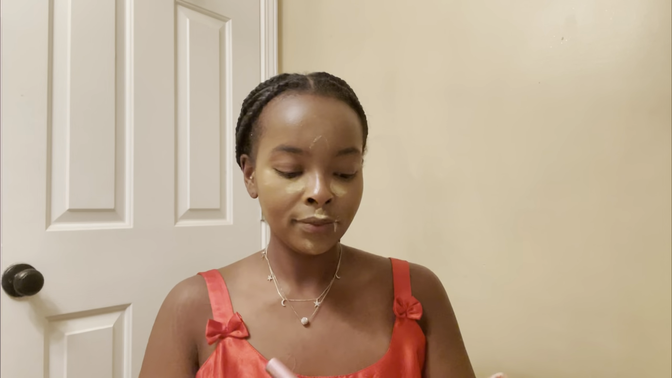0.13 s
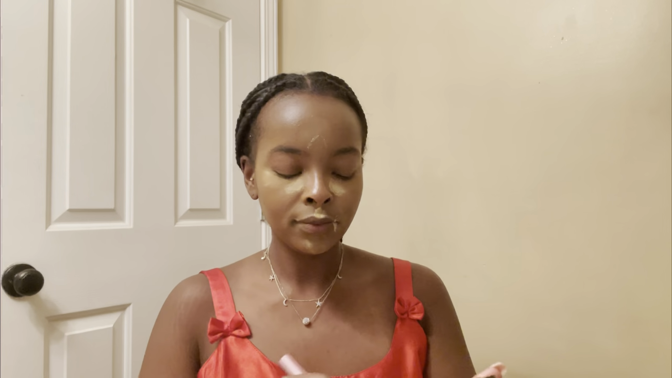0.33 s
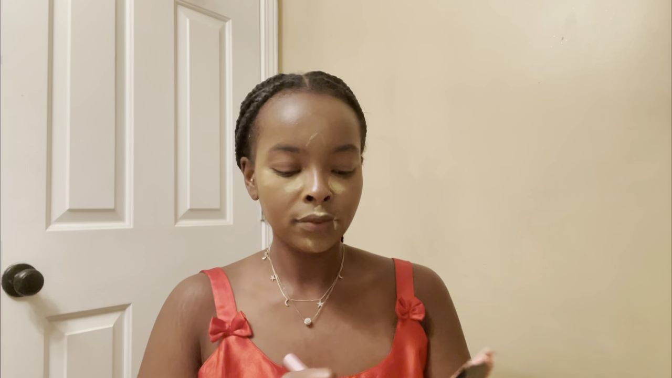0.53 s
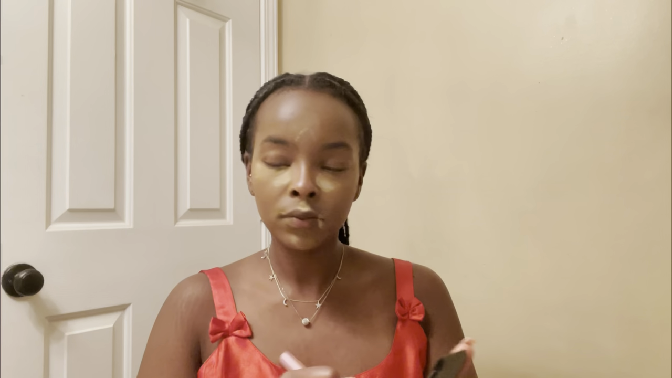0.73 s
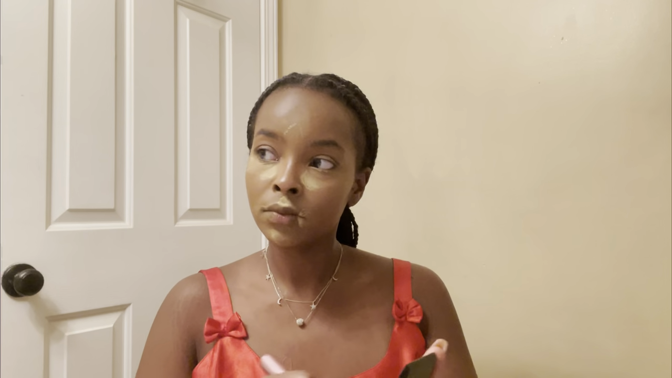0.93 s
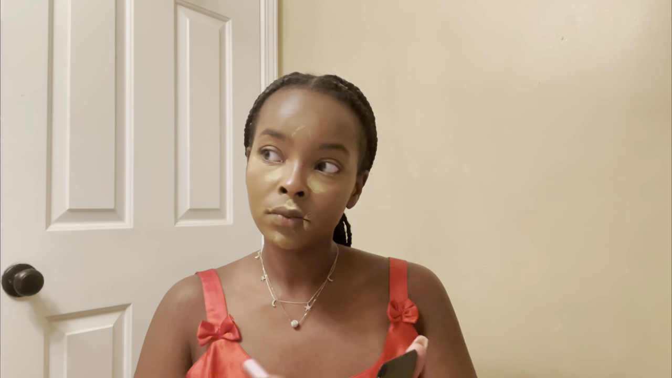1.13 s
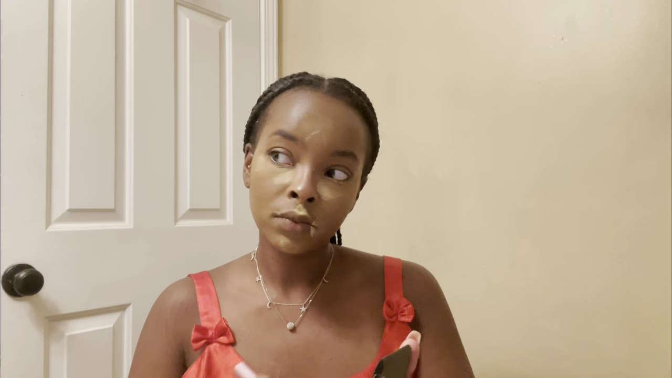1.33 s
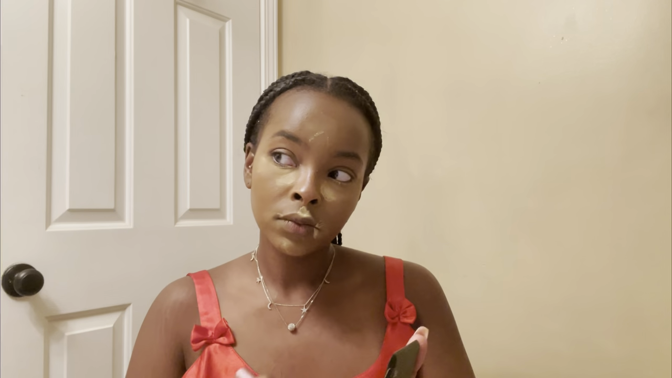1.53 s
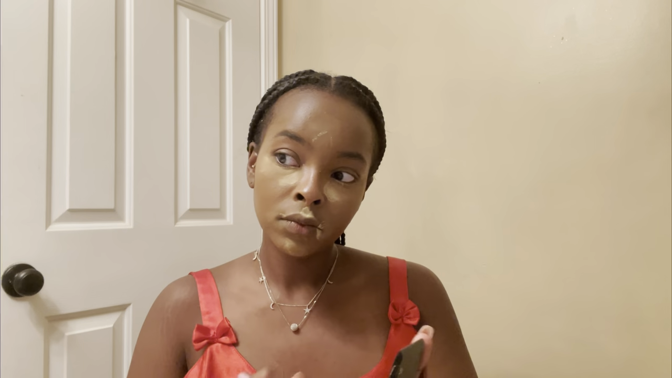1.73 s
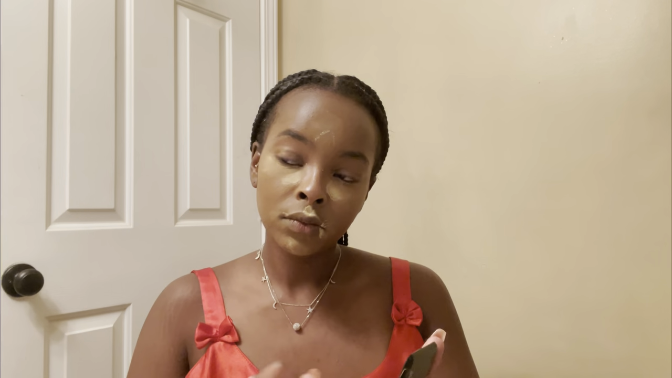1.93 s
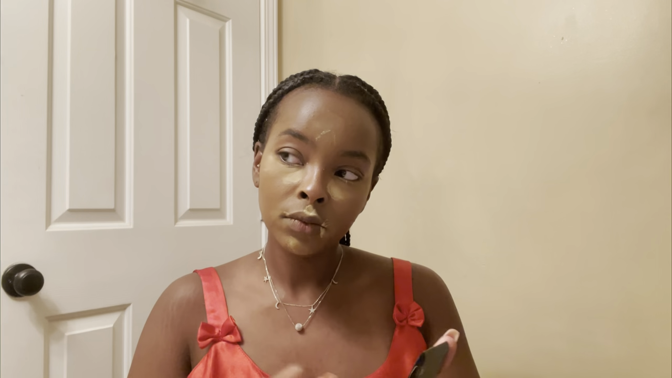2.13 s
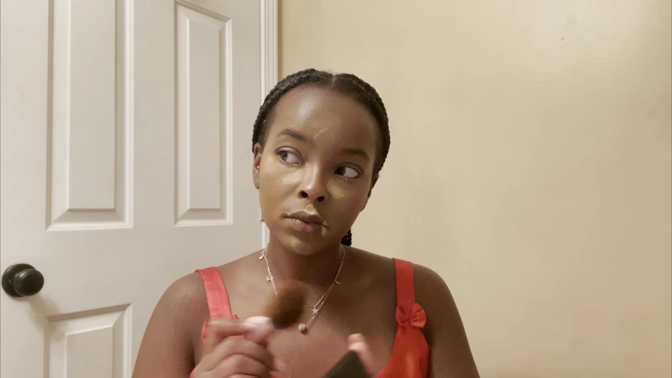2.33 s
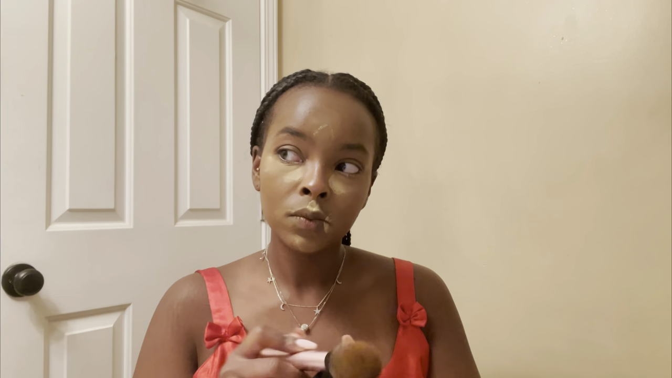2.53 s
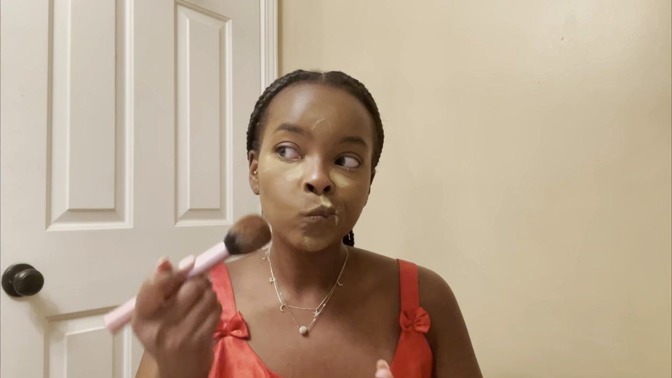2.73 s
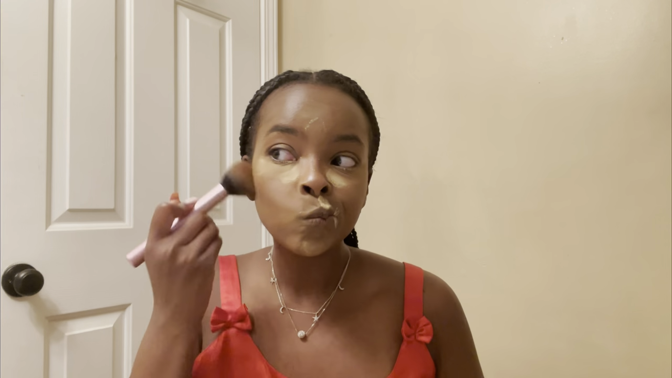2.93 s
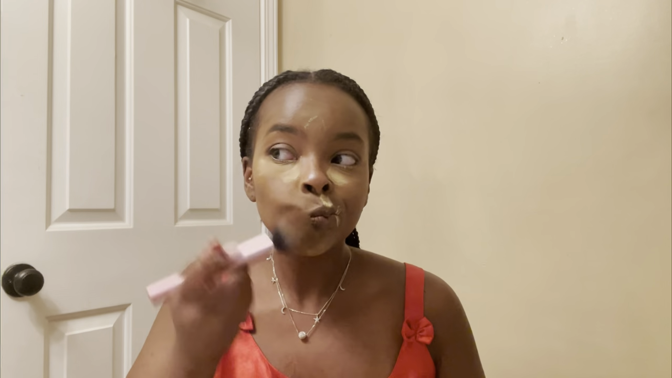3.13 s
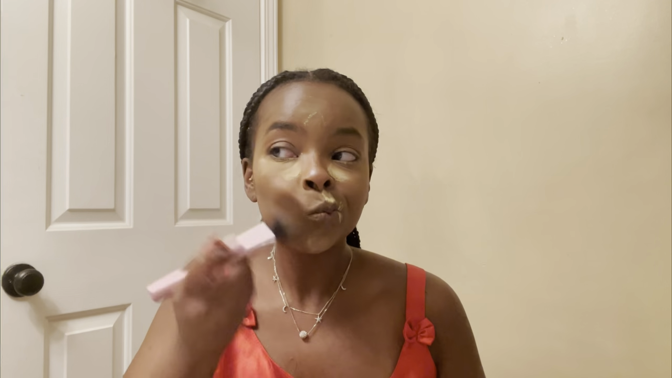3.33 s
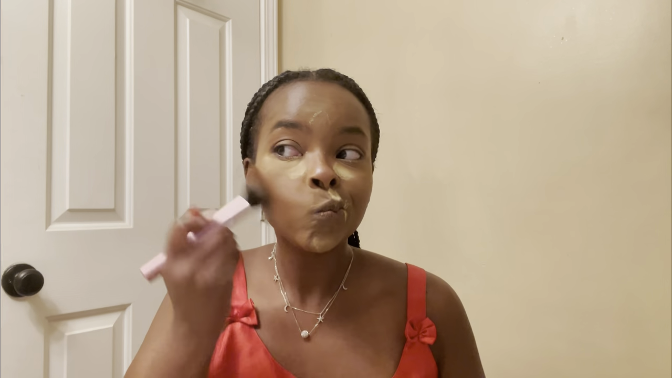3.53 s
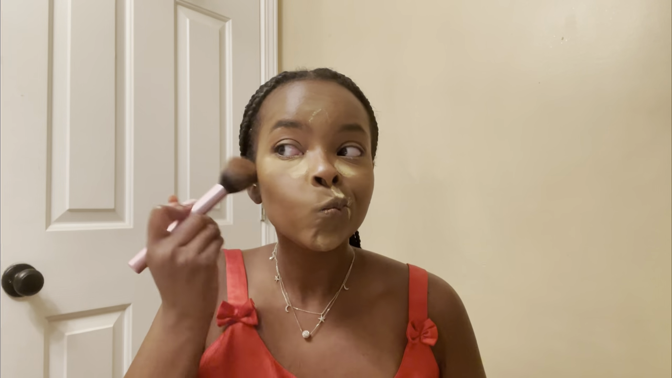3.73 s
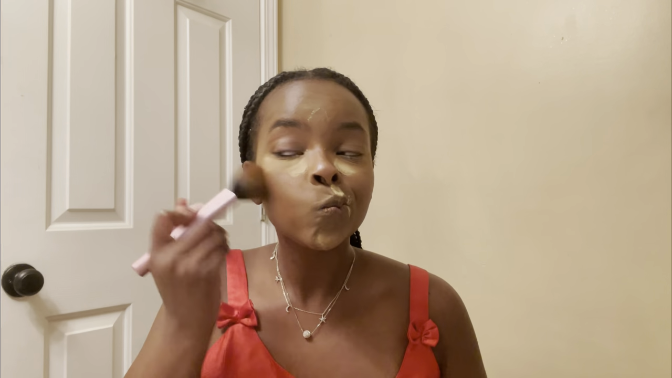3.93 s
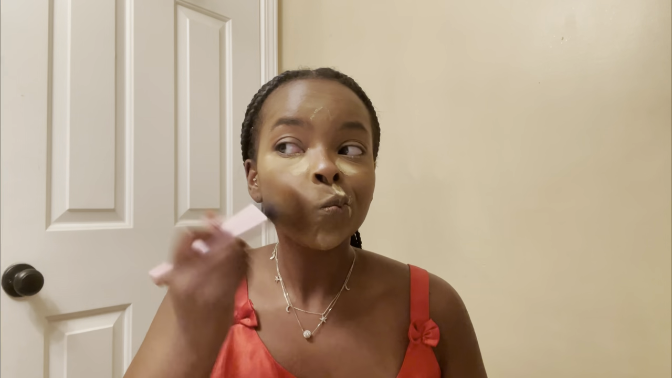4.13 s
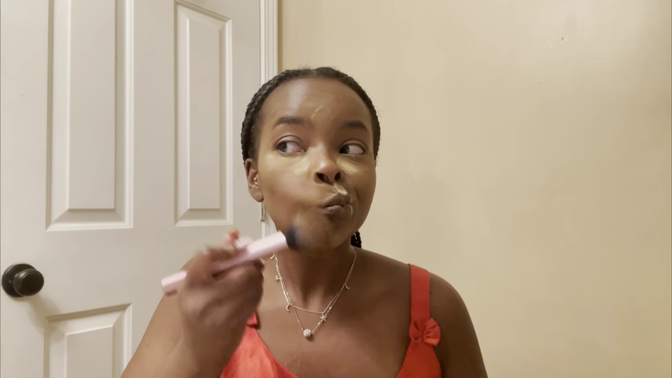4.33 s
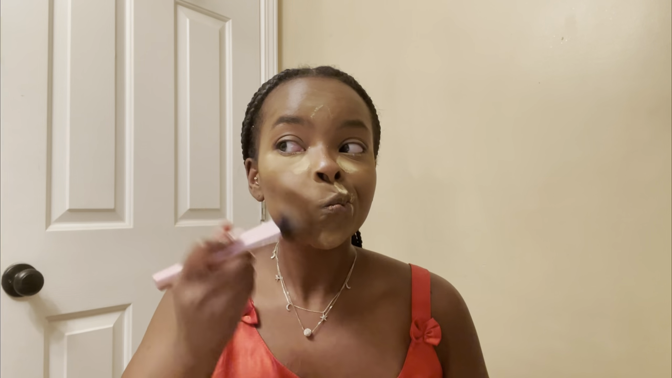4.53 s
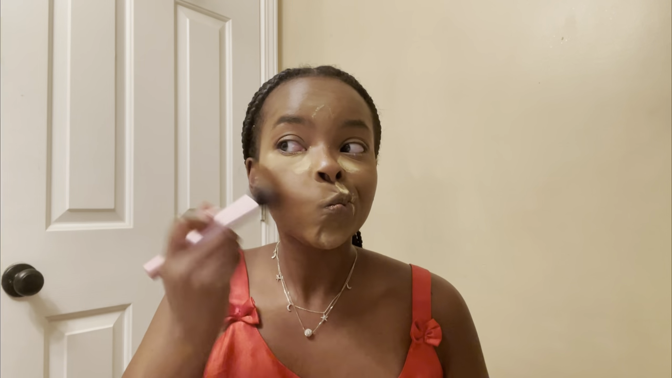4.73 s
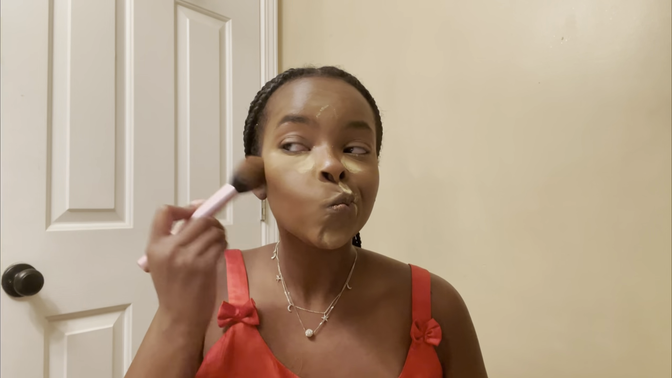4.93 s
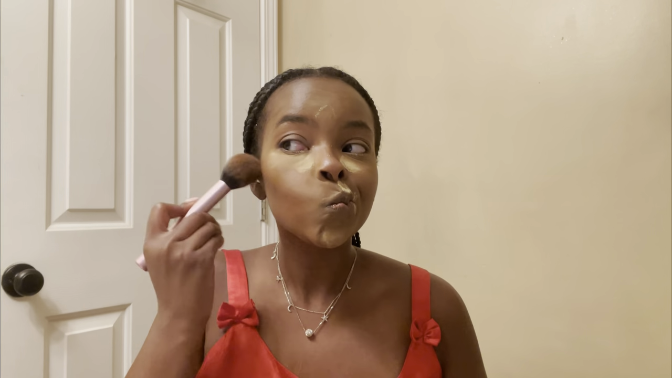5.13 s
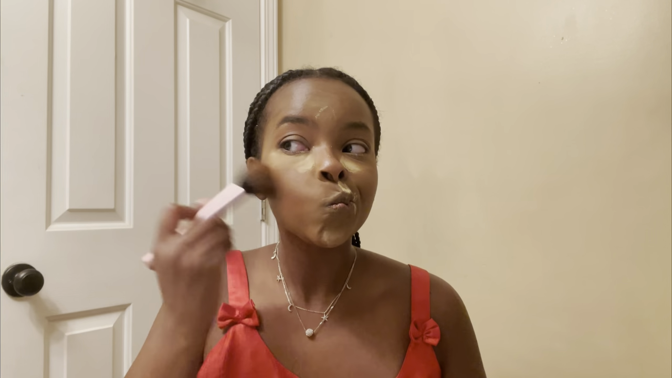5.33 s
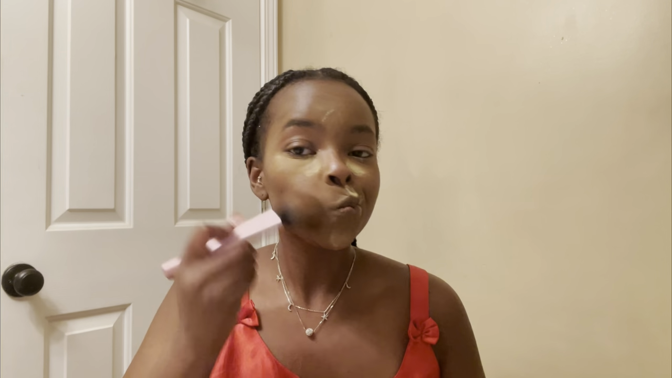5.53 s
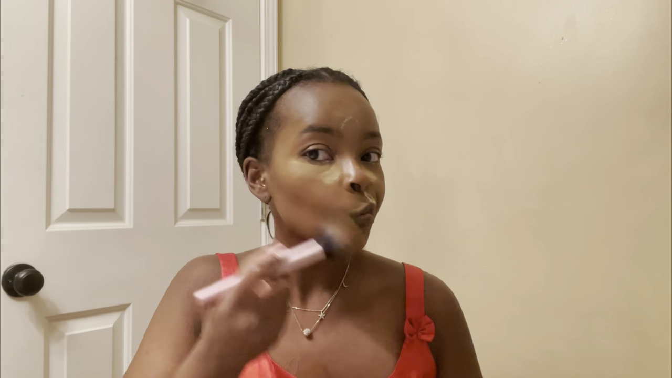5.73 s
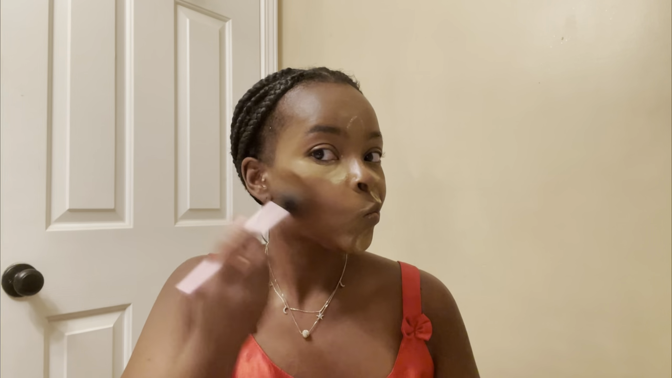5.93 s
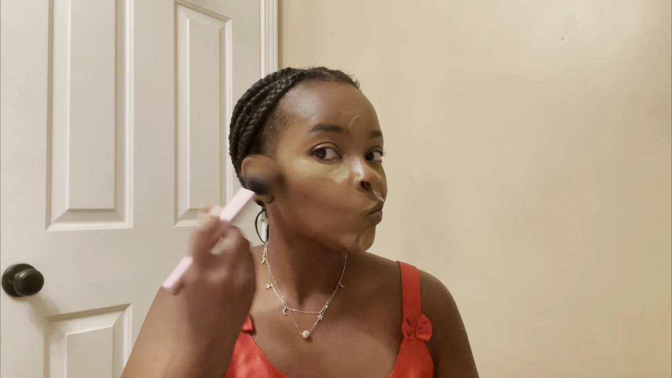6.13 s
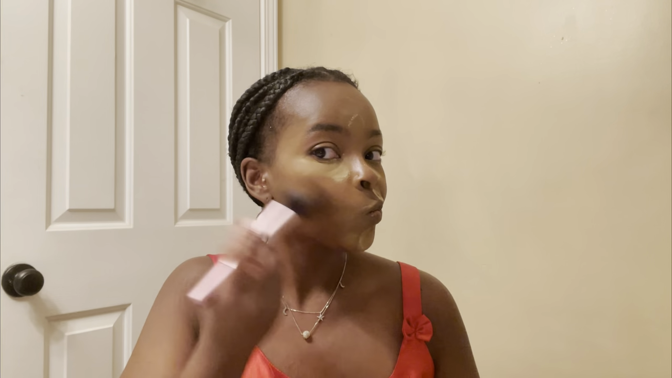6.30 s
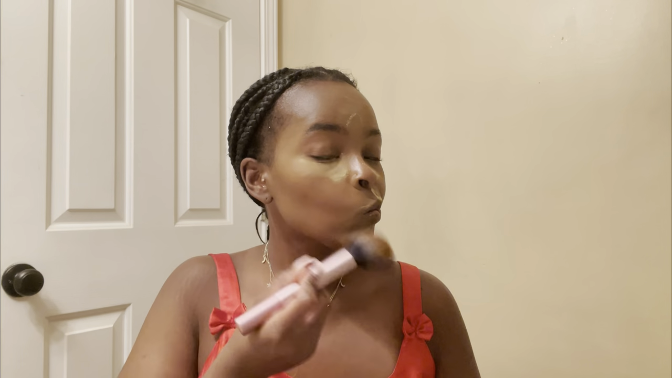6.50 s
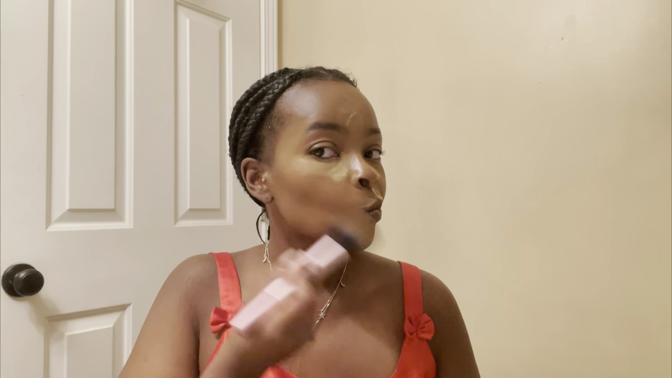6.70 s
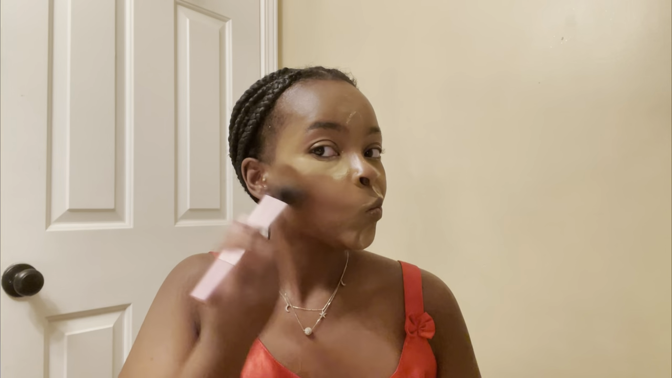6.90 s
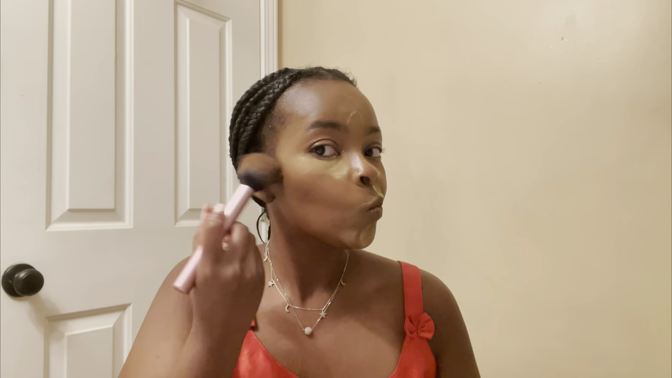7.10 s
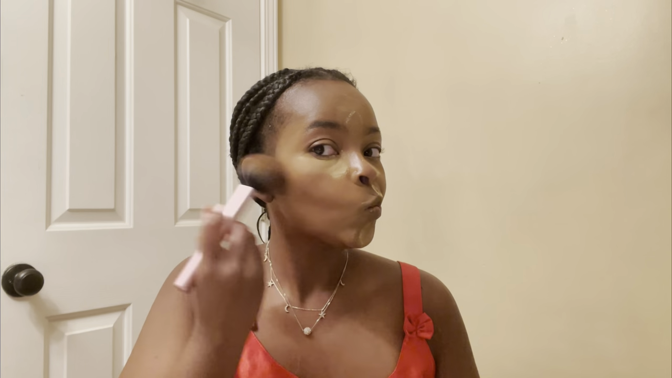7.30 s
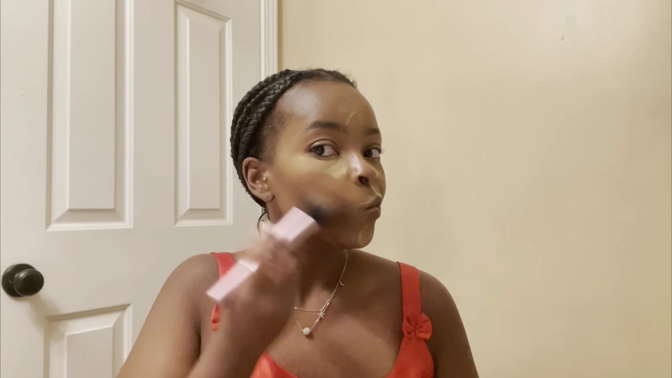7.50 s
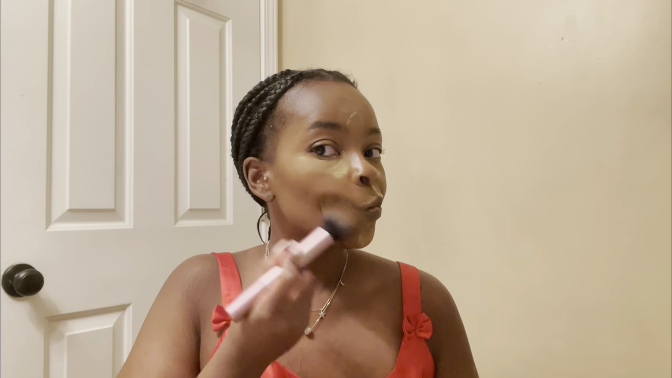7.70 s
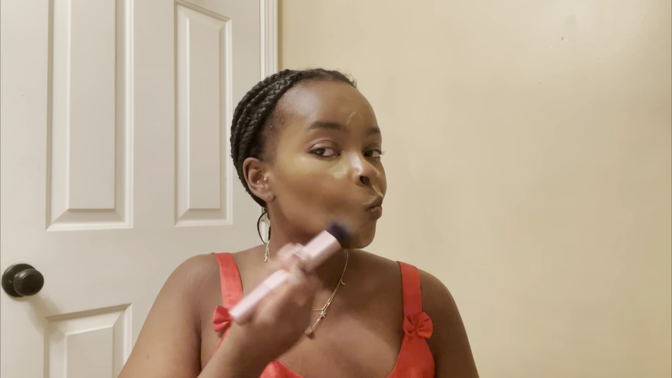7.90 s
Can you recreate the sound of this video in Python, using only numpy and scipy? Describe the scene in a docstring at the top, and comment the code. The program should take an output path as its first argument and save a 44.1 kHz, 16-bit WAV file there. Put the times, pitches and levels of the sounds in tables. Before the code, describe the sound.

In a small, hard-walled room with low ventilation rumble and hum, a soft brush swirls in powder with faint, irregular hissy dabs while a palm slides on the case. Two quick plastic knocks and a tiny tick follow. After a short pause, bristles sweep a cheek in fast, rhythmic out-and-back swishes, with brief breaks. A phone records it in stereo from nearby.

```python
"""Powder brush in a small room

A soft brush is swirled in a powder compact, knocked against it to shed the excess, then swept over a cheek.
Brush and palm are noise shaped stroke by stroke; the knocks set damped modes ringing.
The small, hard-walled room answers the knocks with dense reflections; ventilation rumbles and hums behind.
A phone picks it all up in stereo through two spaced ports."""
import sys
import numpy as np
from scipy import signal
from scipy.fft import rfft, irfft
from scipy.io import wavfile

SR = 44100
rng = np.random.default_rng(int(sys.argv[2]) if len(sys.argv) > 2 else 0)


def put_to_file(sound):
    """Save the sound as 16-bit audio at rate SR, in the file named by the first command-line argument."""
    columns = np.atleast_2d(sound).T  # one column per channel
    safe = np.clip(columns, -1, 1)
    whole_steps = np.round(safe * 32767)
    wavfile.write(sys.argv[1], SR, whole_steps.astype(np.int16))


N = 351010
T = np.arange(N) / SR  # s
HZ = np.maximum(np.fft.rfftfreq(N, 1 / SR), 1)

# All levels are relative: source and mix gains are applied later.
# Dips of the brush into the powder: [centre t/s, half-power length/s, pressure as hiss level/dB]
POWDER_DIPS = [(0.105, 0.055, -78), (0.169, 0.044, -62), (0.365, 0.051, -65.5), (0.586, 0.069, -73),
               (0.723, 0.071, -73.5), (0.879, 0.15, -76.5), (1.086, 0.062, -70.5), (1.272, 0.049, -71),
               (1.46, 0.061, -77.5), (1.657, 0.063, -74), (1.826, 0.077, -75.5), (1.996, 0.049, -68),
               (2.167, 0.043, -70.5)]
# Bouts of sweeping from cheekbone to jaw:
# [start t/s, end t/s, period/s, return stroke after/s, return hiss level/dB, return rub level/dB]
CHEEK_SWEEPS = [(3.094, 3.7, 0.24, 0.11, 0, -3), (3.838, 5.37, 0.23, 0.1, -1.7, -4.5),
                (5.485, 6.35, 0.2434, 0.12, 0.5, 1.5), (6.475, 7.95, 0.24, 0.11, 1.5, 1.6)]
# How hard the brush bears on the cheek: [t/s, hiss level/dB]
CHEEK_PRESSURE = [(3.09, -81.5), (3.6, -78.8), (4.35, -78), (5.05, -81), (5.55, -84), (6.2, -81),
                  (6.9, -77.5), (7.45, -81.5), (7.9, -79)]
# Strokes that land harder: [t/s, extra hiss level/dB, extra rub level/dB]
HARD_STROKES = [(3.2, 2.5, 2), (3.59, 1.5, 5.5), (3.84, 2.5, 4), (4.41, .5, 4), (4.54, .5, 2.5),
                (5.35, 5, 1), (5.84, 3, 4), (6.22, 2.5, 1.5)]
# Spectrum of the hair tips on powder: [f/Hz, level/dB per Hz]
POWDER_HISS = [(3000, -31.5), (5000, -21), (6200, -8), (9000, -2.5), (13500, -0.5), (16000, -6.5)]
# Spectrum of the hair tips on skin: [f/Hz, level/dB per Hz]
CHEEK_HISS = [(3000, -27), (5000, -14.5), (6200, -3), (8000, -4.5), (10000, 1.5), (13500, -2),
              (16000, -4.5)]
# Extra brightness of hairs pressed hard: [f/Hz, level/dB per Hz]
SIZZLE = [(6000, -26), (9000, -9), (12000, -2.5), (14500, 1), (16000, -0.5)]
# Duller rub of the powder pan: [f/Hz, level/dB per Hz]
POWDER_RUB = [(300, -6), (800, -2.5), (1500, 1), (2000, 4.5), (2280, 10.5), (2450, -4.5), (3000, 4.5),
              (4300, -2), (5000, -21.5), (8000, -36)]
# Duller rub of the skin: [f/Hz, level/dB per Hz]
CHEEK_RUB = [(300, -10), (1000, 4), (2200, -2.5), (2600, -4), (3600, 5), (4400, -3.5), (5000, -35),
             (8000, -29)]
# Handle against compact: [t/s, tick level/dB, case level/dB, hollow level/dB, share sent to room/dB]
KNOCKS = [(2.4043, 2.5, 6, 5, -1.5), (2.405, -4.5, -13, -14, -8), (2.4866, -6, 1, 2.5, -7.5),
          (2.4880, -18, -11, -9.5, -11.5), (2.6420, -6.5, -31, -43, -6.5)]
# Bright, quickly damped ring of the hard contact: [f/Hz, level/dB, t60/s]
TICK_MODES = [(3600, -30.5, .002), (6680, -24, 0.0019), (8225, -21, 0.0011), (10370, -18, 0.0016),
              (12460, -18.5, 0.0011), (14700, -23, 0.0012)]
# Ring of handle and case: [f/Hz, level/dB, t60/s]
CASE_MODES = [(1326, -32.5, .014), (1587, -27.5, 0.02), (1956, -24.5, 0.017), (2200, -26.5, 0.012),
              (2900, -27.5, 0.0047), (3480, -31.5, 0.009), (3970, -29.5, 0.0076), (4590, -37.5, 0.015)]
# Hollow of the compact in the hand: [f/Hz, level/dB, t60/s]
HOLLOW_MODES = [(331.4, -43.5, 0.092), (451, -37, 0.041), (660, -33, .022), (855, -30.5, .022),
                (1067, -38, 0.027)]
# Hand shifting round the compact: [centre t/s, half-power length/s, level/dB]
HAND_SHIFTS = [(.02, .1, -68), (.2, 0.23, -77), (.42, 0.25, -78.5), (.78, 0.043, -67), (1.0, 0.22, -81.5)]
# Spectrum of the palm sliding on the case: [f/Hz, level/dB per Hz]
PALM = [(300, -4), (800, 6.5), (1500, 2), (2280, 3), (2500, -10), (3500, -9), (4500, -17), (5500, -26.5)]
# Spectrum of the ventilation air: [f/Hz, level/dB per Hz]
AIR = [(20, -28), (40, -9.5), (64, -1), (90, -3.5), (135, 2), (190, -8.5), (285, -15.5), (380, -19),
       (600, -22.5), (1000, -34), (1500, -39), (2250, -41.5), (2500, -44.5), (4200, -46.5), (5000, -59),
       (6300, -53.5), (11000, -52), (14200, -53.5), (16000, -62)]
# Resonances in the ventilation noise: [f/Hz, width/Hz, peak level/dB]
DUCT_RESONANCES = [(168, 12, 0.5), (220, 20, 6), (318, 5.3, 5.5), (379.6, 20, 9), (473.4, 25, 7.5),
                   (883, 71, 9)]
# Room decay: [f/Hz, t60/s]
ROOM_T60 = [(300, 0.3), (700, 0.32), (1900, 0.32), (4000, 0.33), (8000, 0.26), (15000, 0.14)]
# Side against mid from the spacing of the two ports: [f/Hz, level/dB]
PORT_SPREAD = [(60, -29.5), (150, -27), (400, -13.5), (900, -6.5), (2000, -14), (3900, -9), (5100, 8),
               (7000, 5.5), (10000, -4.5), (13000, -30.5)]
# Left minus right: [f/Hz, level/dB]
LEFT_TILT = [(60, -.3), (180, -1.3), (350, -2.5), (750, -4.5), (1400, 0), (3000, 0), (12000, .4)]
# Likeness of diffuse sound at the two ports: [f/Hz, correlation 0-1]
PORT_LIKENESS = [(100, .996), (350, .92), (800, .6), (2000, .5), (3000, .2), (4200, .45), (6000, .75),
                 (10000, .8), (12500, .99)]

# Pan rub at mean pressure, in dB, and its growth in dB per dB of pressure
PAN_RUB_DB, PAN_RUB_FOLLOWS = -77.5, 0.8
# Stroke on skin: half-power length, rub against hiss, chance spread of its strength
SWEEP_S, SKIN_RUB_DB, SWEEP_SPREAD_DB = 0.053, -4.5, 0.53
HARD_REACH_S = 0.045  # a hard landing lifts strokes within this time of it
HUM_HZ, HUM_DB, AIR_DB = 119.95, -60.5, -56
CUTOFF_HZ = 15800


def powder_strokes():
    """Each dip rubs the pan in step with its pressure; rows of t/s, length/s, hiss/dB, rub/dB."""
    t, length, hiss_db = np.transpose(POWDER_DIPS)
    rub_db = PAN_RUB_DB + PAN_RUB_FOLLOWS * (hiss_db - hiss_db.mean())
    return np.column_stack([t, length, hiss_db, rub_db])


def cheek_strokes():
    """The wrist swings out and back about four times a second; rows of t/s, length/s, hiss/dB, rub/dB."""
    strokes = []
    for start, end, period, back_s, back_hiss_db, back_rub_db in CHEEK_SWEEPS:
        for t in np.arange(start, end, period):
            strokes.append((t, 0, 0))
            strokes.append((t + back_s, back_hiss_db, back_rub_db))
    t, hiss_db, rub_db = np.transpose(strokes)
    for when, more_hiss_db, more_rub_db in HARD_STROKES:
        hard = np.abs(t - when) < HARD_REACH_S
        hiss_db = hiss_db + hard * more_hiss_db
        rub_db = rub_db + hard * more_rub_db
    pressure_db = np.interp(t, *np.transpose(CHEEK_PRESSURE))
    pressure_db = pressure_db + SWEEP_SPREAD_DB * rng.standard_normal(len(t))
    length = np.full(len(t), SWEEP_S)
    return np.column_stack([t, length, pressure_db + hiss_db, pressure_db + SKIN_RUB_DB + rub_db])


def brush(strokes, hiss, rub, hiss_db, rub_db, sizzle_db, grain_db, linger_db, edge, lean):
    """Thousands of hair tips slip and hiss, catching in tufts; the surface under them gives a duller rub."""
    tufts = rms_one(from_db(grain_db * flutter(per_s=270)))
    pressure = swell(strokes[:, [0, 1, 2]], linger_db, linger_s=0.045, edge=edge, lean=lean)
    tips = from_db(hiss_db) * pressure * diffuse(at_hz(hiss) + ripple(depth_db=2.1))
    # the top octave grows faster than the rest as the brush bears down
    bearing_down = pressure * np.sqrt(pressure / pressure.max())
    sizzle = from_db(sizzle_db) * bearing_down * diffuse(at_hz(SIZZLE) + ripple(depth_db=1.5))
    rubbing = swell(strokes[:, [0, 1, 3]], linger_db, linger_s=0.056, edge=edge, lean=lean)
    surface = from_db(rub_db) * rubbing * diffuse(at_hz(rub) + ripple(depth_db=3.0))
    return tufts * (tips + sizzle + surface)


def swell(strokes, linger_db, linger_s, edge=2.0, lean=0.0):
    """Amplitude of strokes: lean makes hairs land faster than they lift, and sound lingers in the room."""
    power = 1e-18
    for t, length, db in strokes:
        offset = 2 * (T - t) / length
        leaning = np.abs(offset - lean * np.abs(offset))
        power = power + from_db(db) ** 2 * 0.5 ** np.minimum(leaning ** edge, 20)
    keep = np.exp(-1 / (linger_s * SR))
    lingering = signal.lfilter([1 - keep], [1, -keep], power)
    return np.sqrt(power + from_db(linger_db) ** 2 * lingering)


def knocks(case_db, tick_db, hollow_db):
    """Knocks arrive directly and by way of the walls, less so where the hand shields them."""
    rows = np.array(KNOCKS)
    direct = contacts(rows, 0.94, case_db, tick_db, hollow_db)
    sent = contacts(rows, from_db(rows[:, 4]), case_db, tick_db, hollow_db)
    return direct + room(sent, wet_db=2.5, build_s=0.0012)


def contacts(rows, gain, case_db, tick_db, hollow_db):
    """Each contact rings the hard surface, the plastic case and the hollow under it."""
    blows = np.zeros((3, N))
    blows[:, np.round(rows[:, 0] * SR).astype(int)] = gain * from_db(rows[:, 1:4].T)
    tick = from_db(tick_db) * ring(blows[0], TICK_MODES)
    case = from_db(case_db) * ring(blows[1], CASE_MODES)
    hollow = from_db(hollow_db) * ring(blows[2], HOLLOW_MODES)
    return tick + case + hollow


def ring(clicks, modes):
    """Each click sets every mode ringing as a decaying sine, with alternating signs."""
    out = np.zeros(N)
    for k, (hz, db, t60) in enumerate(modes):
        r = np.exp(-np.log(1000) / (t60 * SR))
        w = 2 * np.pi * hz / SR
        mode = signal.lfilter([0, np.sin(w)], [1, -2 * r * np.cos(w), r * r], clicks + 1e-18)
        out += (-1) ** k * from_db(db) * mode
    return out


def room(x, wet_db, build_s):
    """Dense reflections build up quickly and die sooner in the treble."""
    t = T[:SR]  # one second, so the bins lie 1 Hz apart
    noise = rfft(diffuse(0 * HZ)[:, :SR])
    hz = np.arange(noise.shape[1])
    edges = np.geomspace(280, 18000, 13)
    tail = 0
    for low, high in zip(edges, edges[1:]):
        band = irfft(noise * (hz >= low) * (hz < high), SR)
        tail = tail + band * np.exp(-np.log(1000) * t / at_hz(ROOM_T60, np.sqrt(low * high)))
    tail = rms_one(tail * (1 - np.exp(-t / build_s))) / np.sqrt(SR)
    return from_db(wet_db) * signal.fftconvolve(x[None], tail, axes=1)[:, :N]


def handling():
    """Skin slides softly on the case: palm-coloured noise swelling with each shift."""
    return swell(HAND_SHIFTS, linger_db=-15.0, linger_s=0.08) * diffuse(at_hz(PALM))


def ventilation():
    """Air rumbles through a resonant duct; the motor hums at twice the mains rate."""
    colour_db = at_hz(AIR) + ripple(depth_db=3.0)
    for hz, width, db in DUCT_RESONANCES:
        colour_db = colour_db + db / (1 + (2 * (HZ - hz) / width) ** 2)
    hum = np.sqrt(2) * np.sin(2 * np.pi * HUM_HZ * T + 0.35 * flutter(per_s=4))
    hum_gain = from_db(HUM_DB + 0.98 * flutter(per_s=2))
    return from_db(AIR_DB) * diffuse(colour_db) + hum_gain * hum


def diffuse(colour_db):
    """Stereo noise of a given colour, as alike at the two ports as their spacing allows; rms 1."""
    mid, side = rfft(rng.standard_normal((2, N)))
    alike = np.clip(at_hz(PORT_LIKENESS), 0, 1)
    pair = np.sqrt(1 + alike) * mid + np.sqrt(1 - alike) * side * [[1], [-1]]
    return rms_one(irfft(pair * from_db(colour_db), N))


def ripple(depth_db):
    """Wall reflections add and cancel, leaving fine peaks and dips above the bass, in dB."""
    spots = np.arange(0, SR, 25)
    peaks = np.interp(HZ, spots, rng.standard_normal(len(spots)))
    return depth_db * peaks / (1 + (800 / HZ) ** 3)


def flutter(per_s):
    """Smooth chance: noise kept to slow rates, with a spread of 1."""
    return rms_one(irfft(rfft(rng.standard_normal(N)) * np.exp(-(HZ / per_s) ** 2), N))


def at_hz(points, hz=HZ):
    """Read a table on a log-frequency axis."""
    f, value = np.array(points).T
    return np.interp(np.log(hz), np.log(f), value)


def from_db(db):
    """Decibels to gain."""
    return 10 ** (np.asarray(db) / 20)


def rms_one(x):
    """Scale to rms 1."""
    return x / np.sqrt(np.mean(x ** 2) + 1e-20)


def scene():
    """Load the brush, knock it off, sweep the cheek."""
    powder = brush(powder_strokes(), POWDER_HISS, POWDER_RUB, hiss_db=-3.0, rub_db=2, sizzle_db=-2.5,
                   grain_db=0.95, linger_db=-4.0, edge=2.6, lean=0.2)
    cheek = brush(cheek_strokes(), CHEEK_HISS, CHEEK_RUB, hiss_db=-2.03, rub_db=1.0, sizzle_db=-9.5,
                  grain_db=1.0, linger_db=-23.0, edge=3.1, lean=0.041)
    knocking = knocks(case_db=-1.5, tick_db=1, hollow_db=-2.0)
    return powder + cheek + knocking + handling() + ventilation()


def record(dry):
    """Two spaced ports turn the phase between the channels and colour them differently; the top is cut."""
    sides = np.array([[1], [-1]])  # left, right
    phase_turn = 1 - 1j * sides * from_db(at_hz(PORT_SPREAD))
    tilt = from_db(sides * at_hz(LEFT_TILT) / 2)
    top = 1 / np.sqrt(1 + (HZ / CUTOFF_HZ) ** 160)
    return irfft(rfft(dry) * phase_turn * tilt * top, N)


dry = scene()
out = record(dry)
put_to_file(out)
```